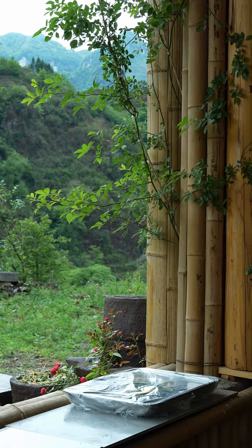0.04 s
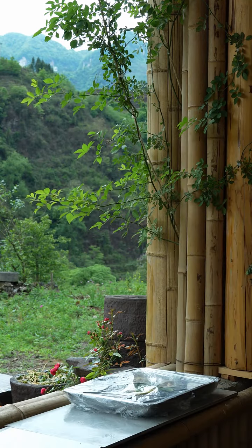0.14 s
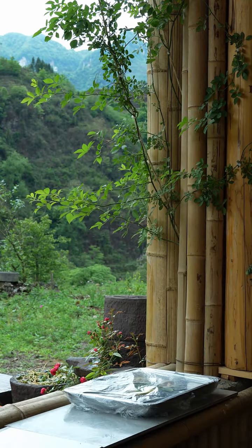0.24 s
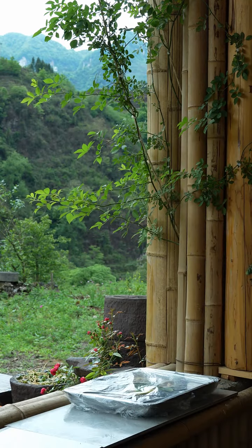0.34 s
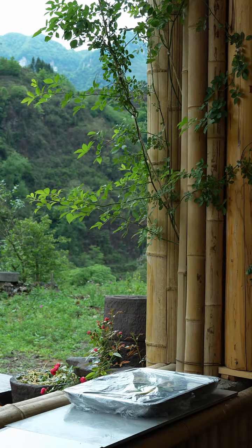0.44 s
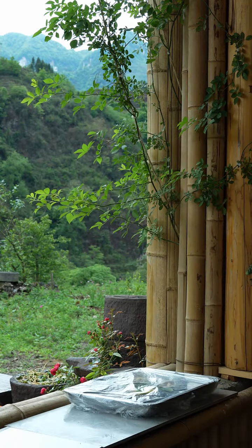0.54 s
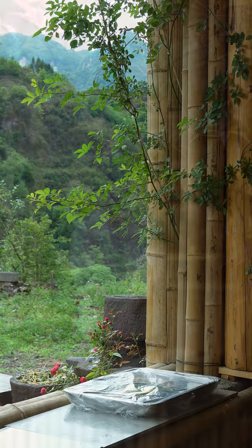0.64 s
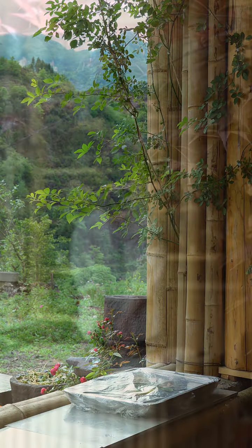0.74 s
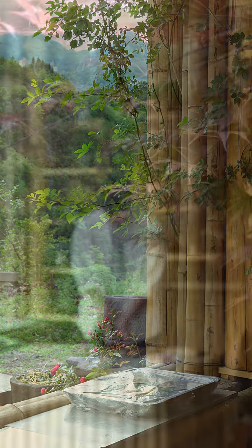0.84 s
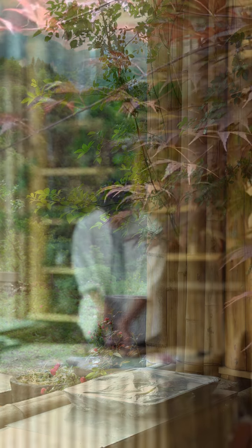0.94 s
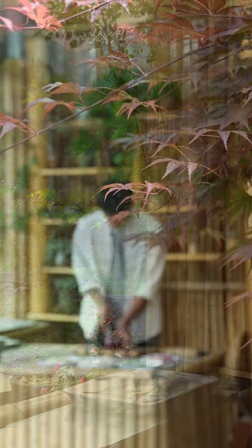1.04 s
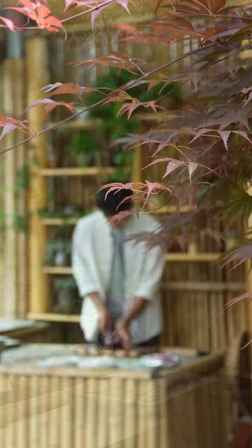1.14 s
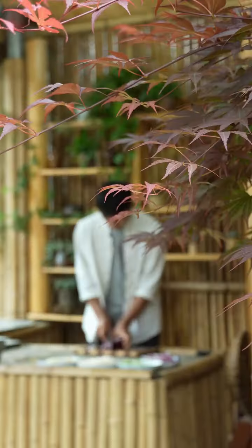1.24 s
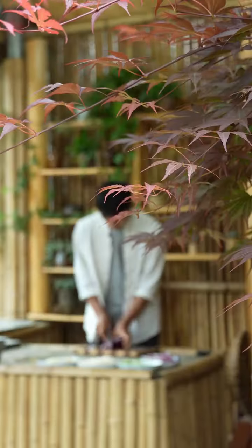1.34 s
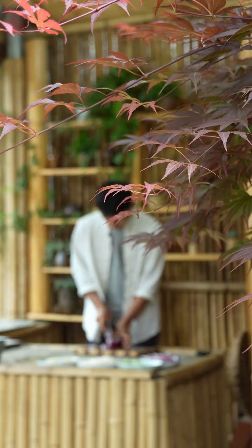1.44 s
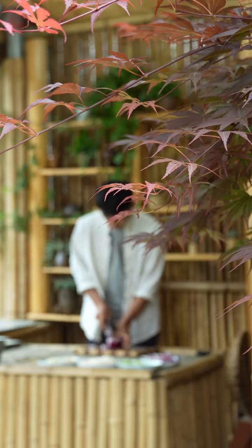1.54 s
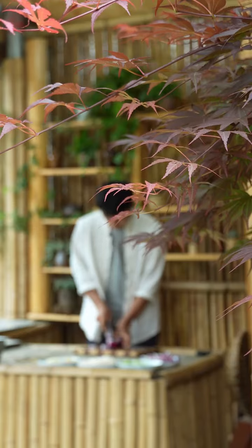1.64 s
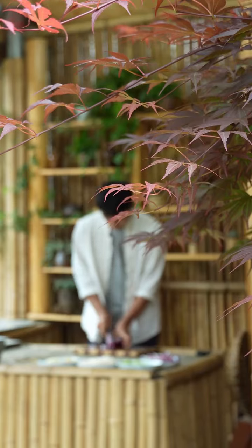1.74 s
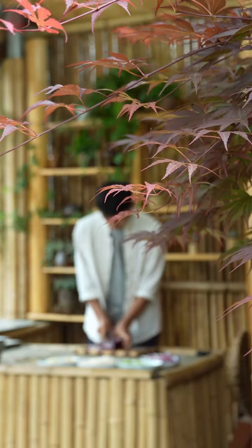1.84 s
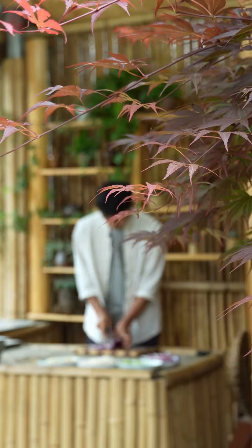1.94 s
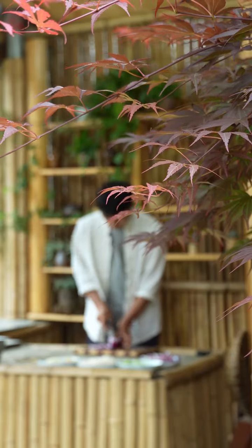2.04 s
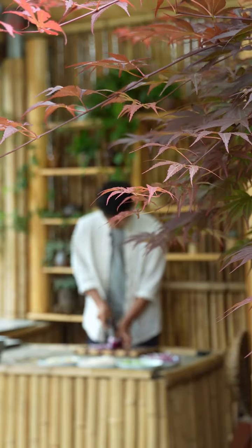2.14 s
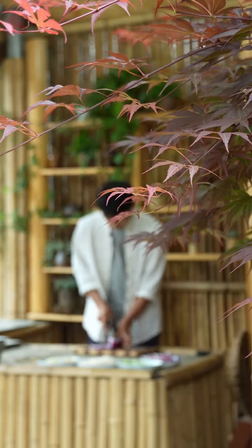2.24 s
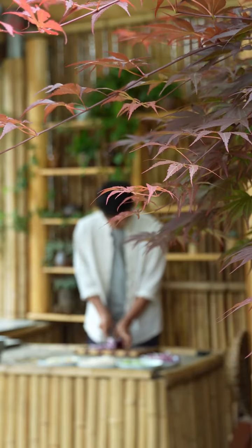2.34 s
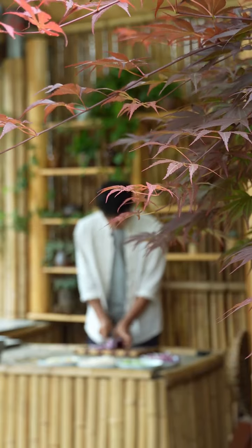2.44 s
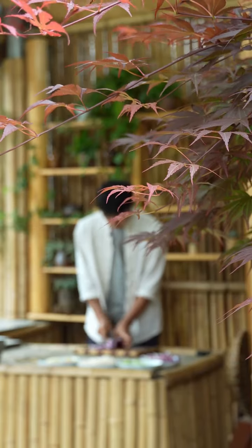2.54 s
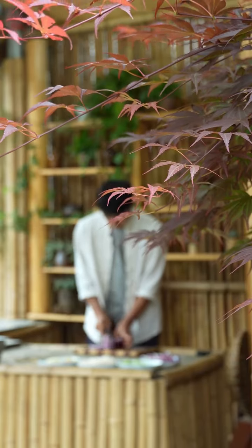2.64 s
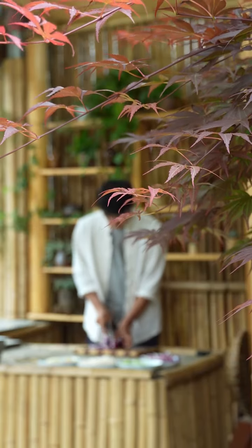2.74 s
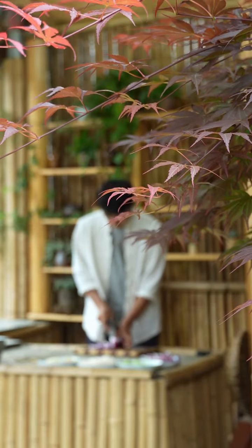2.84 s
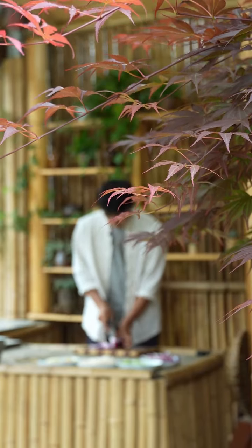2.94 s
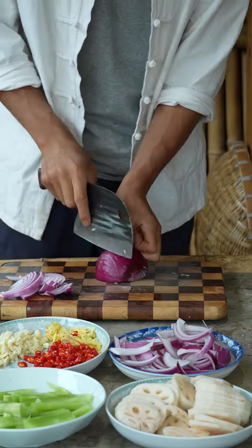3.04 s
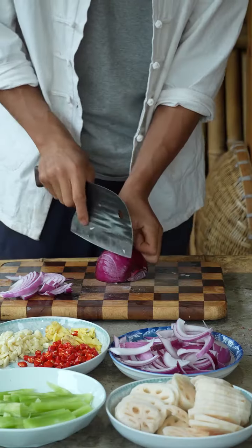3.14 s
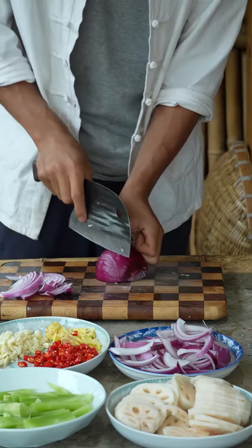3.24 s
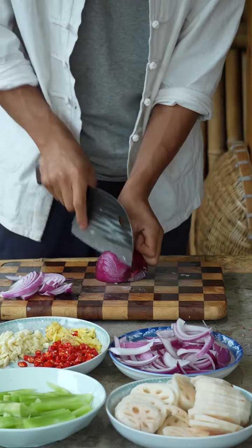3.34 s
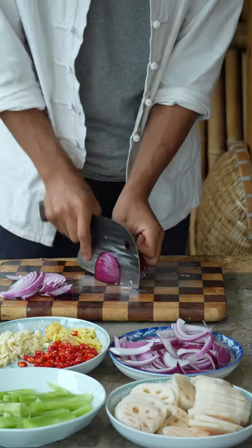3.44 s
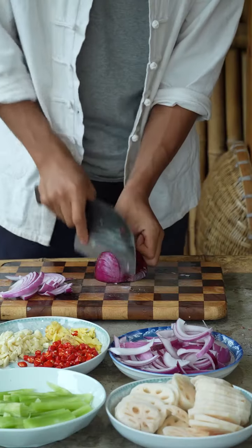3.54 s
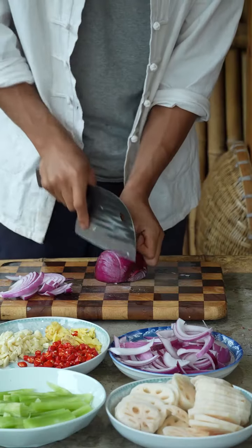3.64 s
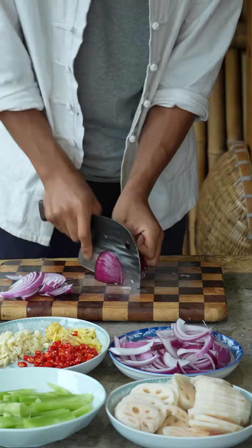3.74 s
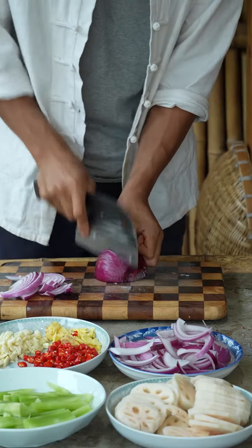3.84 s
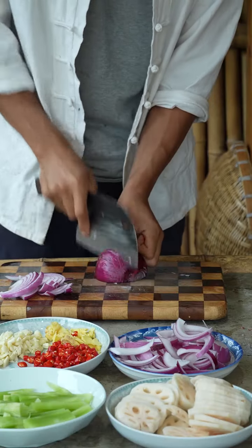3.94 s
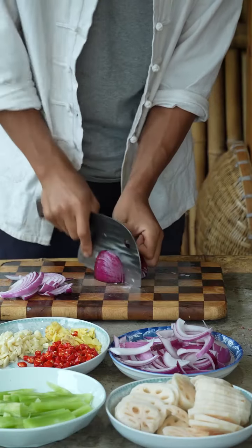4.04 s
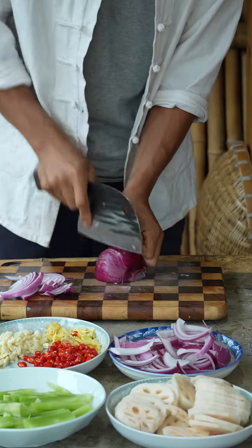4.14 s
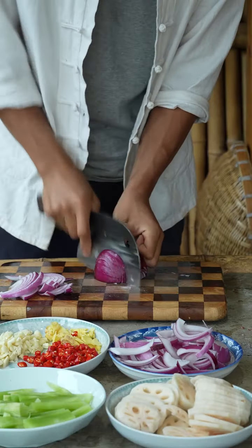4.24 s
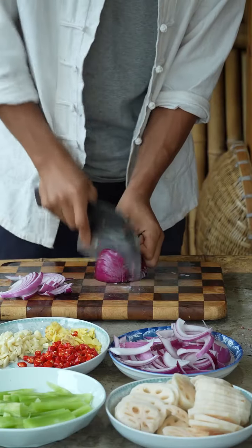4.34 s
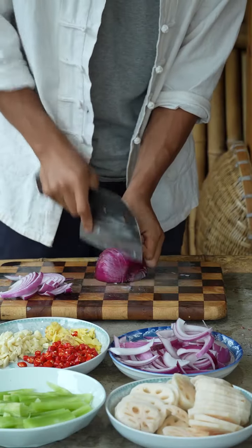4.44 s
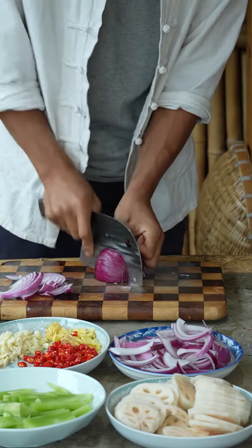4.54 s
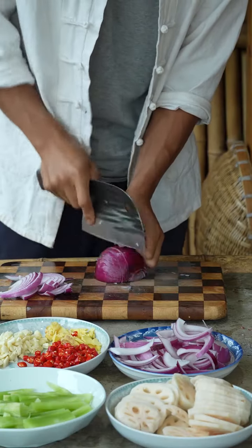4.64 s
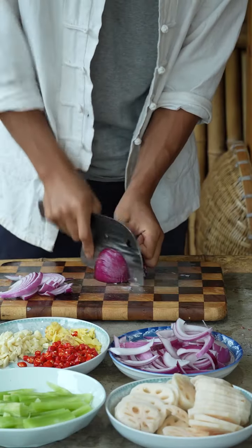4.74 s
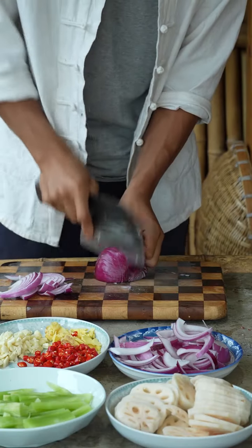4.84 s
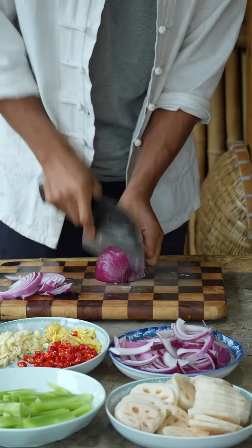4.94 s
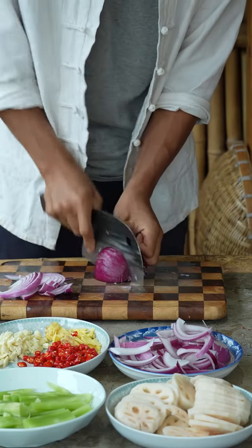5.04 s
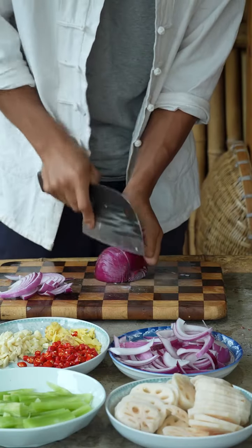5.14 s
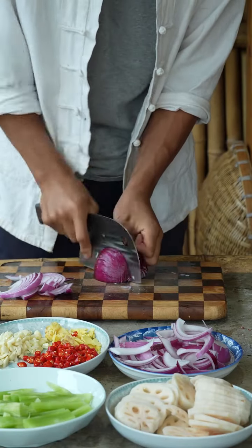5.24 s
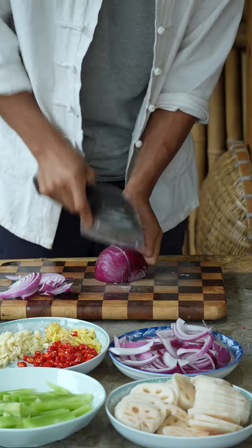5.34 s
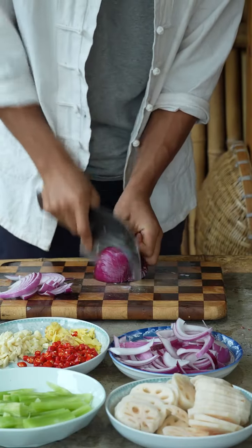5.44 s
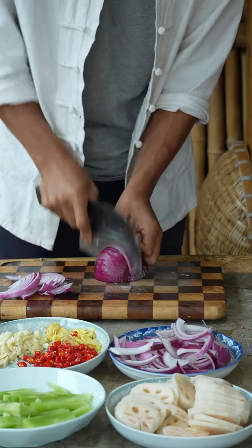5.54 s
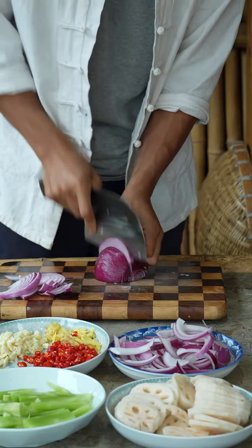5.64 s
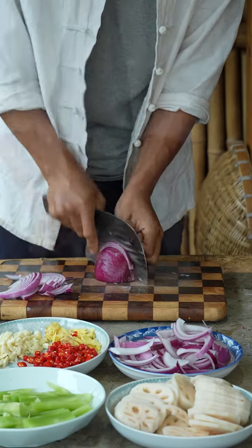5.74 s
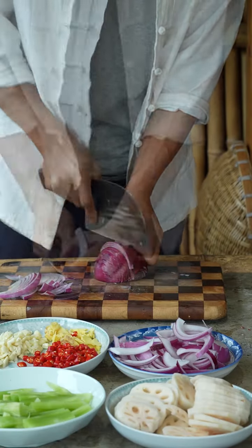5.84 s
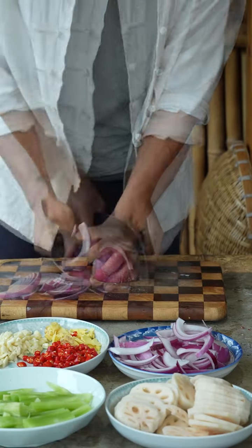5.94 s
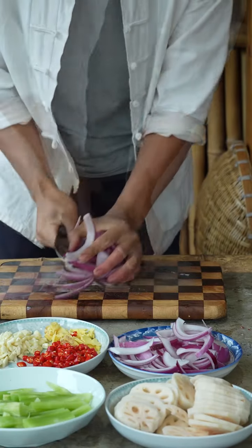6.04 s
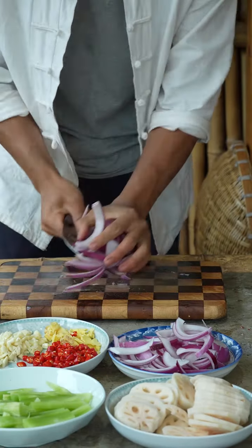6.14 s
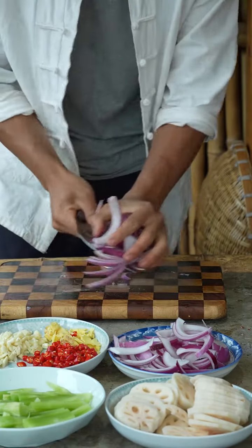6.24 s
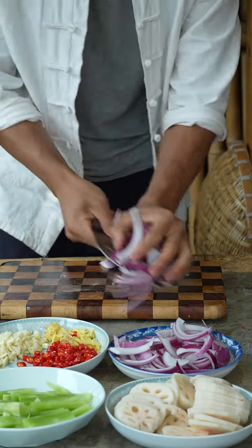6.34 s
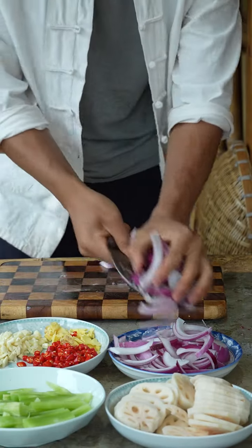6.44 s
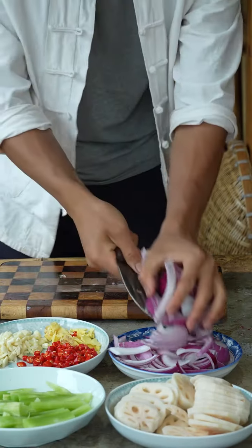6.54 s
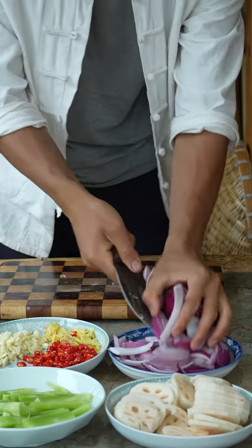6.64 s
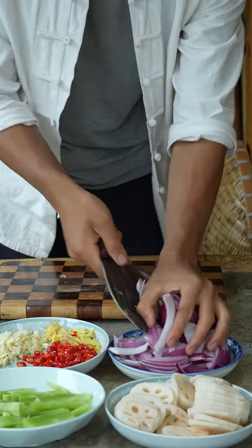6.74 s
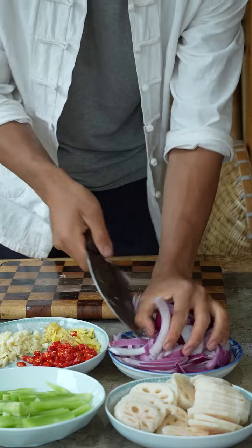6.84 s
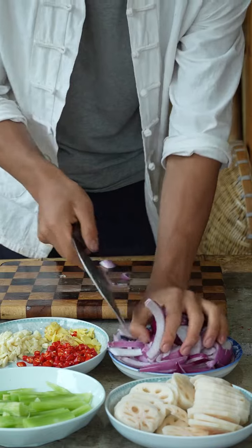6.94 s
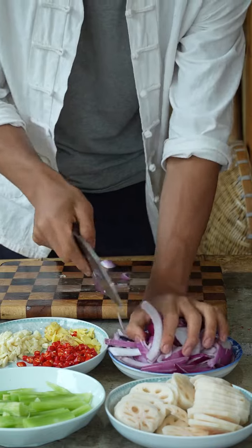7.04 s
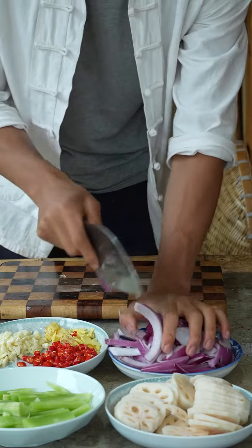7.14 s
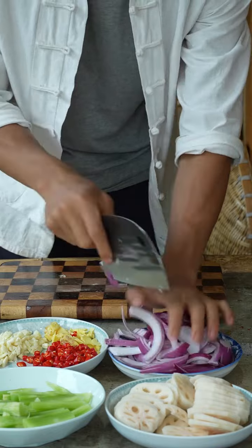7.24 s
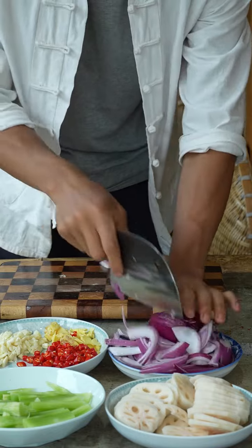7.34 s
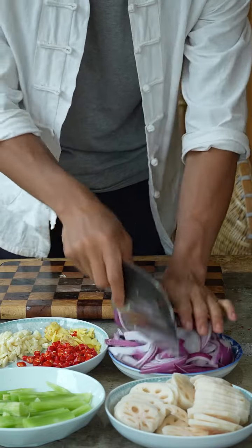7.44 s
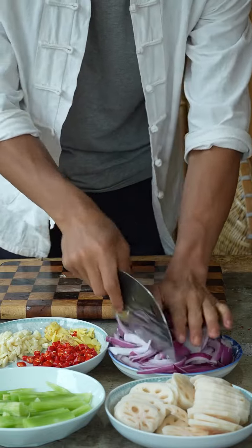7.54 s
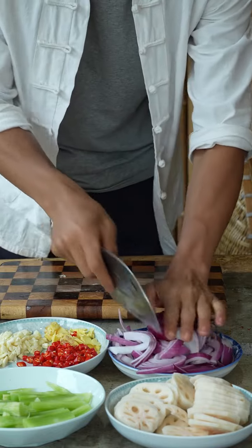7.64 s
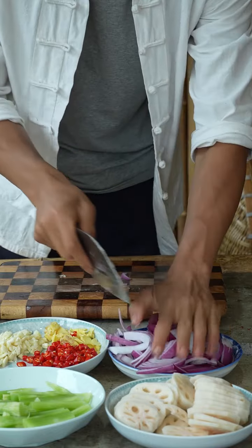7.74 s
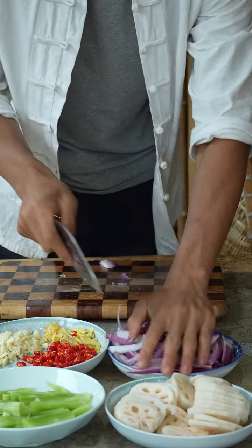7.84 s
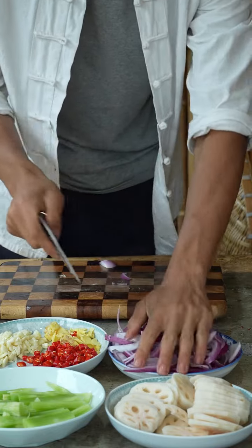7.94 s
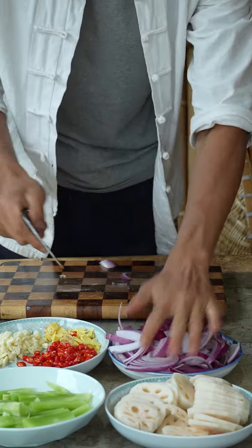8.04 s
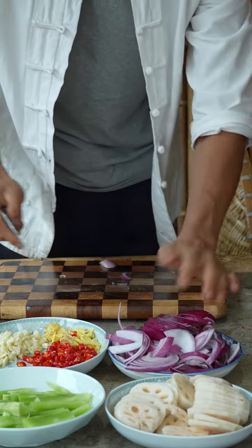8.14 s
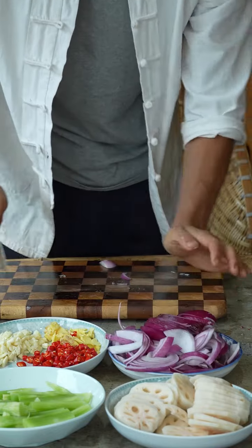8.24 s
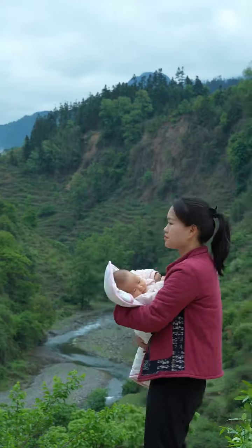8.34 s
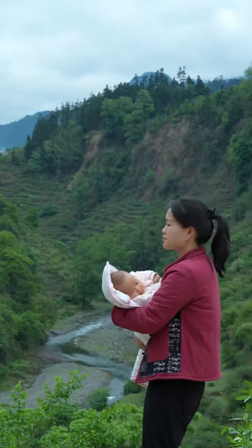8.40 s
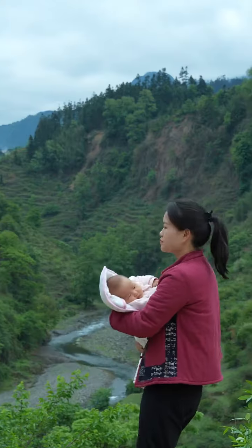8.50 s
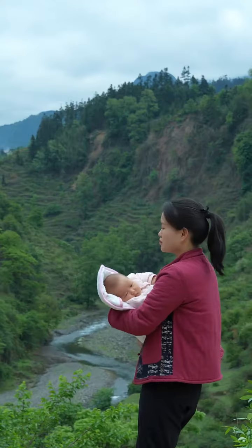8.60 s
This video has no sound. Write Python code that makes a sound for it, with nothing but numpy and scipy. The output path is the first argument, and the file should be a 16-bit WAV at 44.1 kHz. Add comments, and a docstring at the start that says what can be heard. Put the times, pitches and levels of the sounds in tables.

```python
"""A soft rustle in an open kitchen, with short swishes and taps of handling from left, middle and right.
Then a cleaver chops onion on a wooden board close to the microphone: single chops, then a fast run.
The blade crunches through the flesh and knocks the board, which rings and overloads the recorder.
Low air lies underneath; near the end the sound drops out and a quiet outdoor hush fades in."""
import sys
import numpy as np
from scipy import signal
from scipy.fft import rfft, irfft, next_fast_len
from scipy.io import wavfile
from scipy.ndimage import uniform_filter1d

SR = 44100
rng = np.random.default_rng(int(sys.argv[2]) if len(sys.argv) > 2 else 0)


def put_to_file(sound):
    """Save the sound as 16-bit audio at rate SR, in the file named by the first command-line argument."""
    columns = np.atleast_2d(sound).T  # one column per channel
    safe = np.clip(columns, -1, 1)
    whole_steps = np.round(safe * 32767)
    wavfile.write(sys.argv[1], SR, whole_steps.astype(np.int16))


N = 382347

# Blade on board, centre. Each row: time in seconds, peak in dB, low tone in Hz, upper tones, clack and
# thud in dB over the low tones, ring time factor, punch in dB over the ring, rebound delay in ms,
# rebound in dB, top tones in dB, rise in ms.
CHOPS = [(1.308, 0, 771, -22, -34, -21, 1.36, -30, 26, -6.5, -13.5, 3.9),
         (1.877, 0.5, 755.5, -26.5, -22, -22, 0.34, -18, 30, -8.5, -24, 7.2),
         (2.475, 1.5, 790, -14.5, -18.5, -23, 0.39, 3.5, 12, 3, -26.5, 1.6),
         (3.530, -5, 771, -20, -26.5, -21.5, 0.46, -19, 38, -11, -24, 7.7),
         (3.826, -9.5, 752, -19.5, -14, -22, 0.82, -5, 15, -17, -18.5, 3.3),
         (4.098, 1.5, 779, -13.5, -46, -21.5, 0.7, 1, 25, -7, -36.5, 6.3),
         (4.353, 4, 808, -13.5, -44, -11, 1.1, 23.5, 16, -16.5, -15, 1.5),
         (4.609, 0.5, 833, -7, -29, -27, 0.68, 13.5, 14, -17, -23, 3.6),
         (4.845, 3, 811, -7.5, -45.5, -18, .87, 5.5, 12.5, -0.5, -30.5, 2.9),
         (5.086, 2.5, 833, -5, -26, -36.5, 0.99, 2.5, 14, -13.5, -33, 7.2),
         (5.311, 2.5, 840, -20.5, -8.5, -34.5, 0.84, -19, 16, -14, -45, 3.2),
         (5.566, 2.5, 831, -16, -29, -29.5, 0.89, 3.5, 11, -13.5, -29, 8.3),
         (5.809, 2.5, 832.3, -10.5, -36, -47, 1.1, -2.5, 8, -9, -24, 4.2),
         (6.043, 1.4, 835, -11.5, -19.5, -31, 0.73, 7, 26, -9, -23, 7.1)]
# Blade into onion. Each row: time of the skin's snap in seconds, snap in dB, crunch in dB,
# seconds from the snap until the crunch fades.
CUTS = [(2.433, -32.5, -29.5, 0.057), (4.024, -7.5, -33.5, 0.062), (4.288, -13.5, -24, 0.054),
        (4.543, -21, -26, 0.059), (4.784, -9.5, -25, 0.056), (5.016, -9.5, -24.5, 0.054),
        (5.258, -8, -33, 0.043), (5.504, -28, -25, 0.059), (5.728, -18, -23.5, 0.06),
        (5.983, -16, -24.5, 0.058)]
# The board's low modes, which shift with the place of the blow.
# Each row: factor on the low tone, level in dB, t60 in seconds.
BOARD_LOW = [(1, 2, 0.13), (0.91, -12, 0.17), (1.07, -8.5, 0.076), (1.2, -21, 0.086), (0.748, -16.5, 0.077),
             (0.53, -25.5, 0.15)]
# Modes of board, blade and table. Each row: frequency in Hz, level in dB, t60 in seconds.
BOARD_UPPER = [(1255.4, 10, 0.093), (1250, -23.5, 0.15), (1080, -26.5, 0.33), (990, -6.5, 0.024),
               (1391, -4, 0.053)]
BOARD_TOP = [(1693, 2.5, 0.019), (1480, -12, 0.032), (2000, -10, 0.072), (2247, -6.5, 0.016)]
BLADE_MODES = [(2663, 6, 0.015), (2186, -12.5, .06), (3000, -9.5, .04), (2420, -12.5, .05),
               (2940, -20.5, 0.033), (4470, -23, .012), (5760, -26.5, .01)]
TABLE_MODES = [(340, 8, 0.011), (207, -7.5, 0.12), (120, -10.5, 0.065)]
# Things being handled. Each row: start in seconds, click in dB, ring in dB, pitch in Hz,
# left over right in dB.
TAPS = [(.683, -38, -41, 4600, -22), (1.048, -24.5, -44, 880, -15), (1.50, -51, -33, 103, .5),
        (1.566, -33.5, -45, 3860, -18), (1.781, -39, -43, 4930, -19), (7.812, -21, -30, 815, .3),
        (8.184, -32, -43, 990, 14), (8.489, -39, -41, 790, -2)]
# Swishes of handling. Each row: end of the rise in seconds, hold, rise and fall in ms,
# bright and deep parts in dB, left over right in dB.
SWISHES = [(.685, 57, 7.4, 100, -38.5, -51, -21.5), (1.05, 67, 33, 62, -45.5, -50, -32),
           (1.33, 27, 20, 230, -42, -29.5, 0), (1.4, 94, 140, 34, -33, -42.5, -6),
           (1.57, 50, 22, 120, -33.5, -45, -6.5), (1.79, 117, 20, 60, -32.5, -47.5, -10.5),
           (1.9, 25, 62, 230, -31.5, -30, -0.5), (2.48, 15, 64, 177, -37, -32, 3.5),
           (2.9, 33, 110, 200, -40, -42.5, 0), (3.082, 70, 22, 190, -33, -40.5, -0.5),
           (3.3, 32, 110, 69, -47.5, -55, -20), (3.5, 33, 93, 65, -30.5, -37, 0),
           (3.6, 50, 69, 180, -33, -38.5, -12), (3.8, 83, 195, 120, -27.5, -33, 0),
           (3.98, 100, 55, 100, -39, -44, -21), (4.059, 30, 110, 390, -31, -33, 0),
           (6.4, 30, 120, 170, -33.5, -37, 0.5), (6.55, 54, 40, 43, -41.5, -69, -25.5),
           (6.72, 85, 17, 67, -43, -46, -22), (6.84, 58, 110, 100, -43.5, -42.5, 11),
           (6.92, 56, 67, 72, -38, -48, -21), (7.05, 150, 100, 150, -40.5, -44, 6.5),
           (7.28, 67, 100, 96, -37.5, -47.5, -14.5), (7.422, 73, 21, 74, -28.5, -39, 0),
           (7.66, 46, 63, 46, -35.5, -46, -13), (7.81, 28, 11, 110, -36.5, -43, -1),
           (7.87, 19, 50, 45, -43, -53, -18), (7.96, 40, 52, 100, -32.5, -40, 0.5),
           (8.186, 28, 8, 63, -38, -47, 13.5), (8.37, 26, 124, 67, -39, -44.5, 12.5)]
# The rustle in the middle. Each row: time in seconds, bright and deep parts in dB.
RUSTLE_LEVELS = [(0, -42, -43.5), (.08, -47.5, -48.5), (.26, -35, -38), (.47, -52, -50), (.62, -38, -43.5),
                 (.82, -39, -42.5), (.94, -33, -38.5), (1.2, -47.5, -47), (2.15, -46.5, -49),
                 (2.38, -42, -42.5), (2.68, -53.5, -49), (3.4, -58, -48), (4.2, -55.5, -41),
                 (6.1, -36.5, -43), (6.35, -45.5, -44), (7.15, -42, -45), (7.6, -45.5, -44.5),
                 (8.5, -58, -44.5), (8.54, -66.5, -76.5), (8.62, -61.5, -59), (8.67, -55, -51)]
# Slow curves. Each row: time in seconds, level in dB.
SHEEN_LEVELS = [(5.85, -35), (5.93, -11), (6, -19.5), (7.6, -38.5), (7.73, -11.5), (8, -22), (8.15, -13),
                (8.67, -25.5)]  # a thin high sheen, relative to the bright part
SIDE_LEVELS = [(0, -15.5), (.45, -12.5), (1.1, 1), (1.27, -22), (1.45, -5), (2, -11.5), (2.9, -11),
               (3.15, -2.5), (3.8, -15.5), (4.2, -21), (6.15, -23), (6.35, 0.5), (7.3, 2), (7.75, -11),
               (8, -2), (8.67, -7)]  # stereo width of rustle and swishes
AIR_LEVELS = [(0, -56.5), (2, -55.5), (4, -57), (5, -78), (7, -79), (8.67, -70)]
# Spectra. Each row: frequency in Hz, gain in dB.
CRUNCH_SPECTRUM = [(200, -14), (500, -9), (850, 11), (1250, 2), (1900, 11.5), (3200, 8.5), (4500, 5),
                   (6000, 5), (12000, 9.5)]
BASS_CUT = [(20, -39), (200, -17), (500, -6.5)]  # hum and shaken board carry little bass
SWISH_SPECTRUM = [(600, -41), (1300, -10.5), (2000, -9.5), (3000, -1.5), (4500, -3), (5600, -6),
                  (7000, -5.5), (12000, 0)]  # bright part of a swish
BRIGHT_SPECTRUM = [(600, -49), (1300, -3.5), (2000, -9.5), (3000, 0.6), (4200, -4.5), (5600, -9.5),
                   (7000, -9), (12000, 0.5)]  # bright part of the rustle
DEEP_SPECTRUM = [(30, -27.5), (70, -43), (130, -17.5), (250, -7.5), (500, -5.5), (850, -1.3), (1250, -5.5),
                 (2000, -11), (3500, -21)]  # deep part of both
SHEEN_SPECTRUM = [(4600, -36), (5250, -6), (5700, 0), (6050, -6), (6700, -36)]
AIR_SPECTRUM = [(15, 0), (30, -3), (50, .1), (80, -14.5), (130, 7), (250, 3), (450, -27.5)]
MIC_RESPONSE = [(20, -7), (5800, 1), (6800, -6), (7600, -17.5), (8600, -25.5), (10000, -44), (12000, -74),
                (22000, -95)]
# How alike the noise is left and right. Each row: frequency in Hz, correlation.
LIKENESS = [(60, 0.52), (200, 0.65), (650, 0.54), (2160, 0.38), (7130, 0.12)]
# The level dips briefly. Each row: start in seconds, end in seconds, depth in dB.
DIPS = [(1.495, 1.555, -6), (1.685, 1.769, -7.5), (8.498, 8.56, -24.5)]

HUM_DB, HUM_T60_S = -26, 0.38  # table and room keep the tones going
THUMP_DB, THUMP_MS = -4.5, 0.92  # a short, dull low thump at the knock's peak; level over the thud
TICK_DB, SHAKEN_DB = -14.5, -11  # edge on wood, over the low tones; shaken board, over the crunch
LEAD_S, BITE_S, THROUGH_S = 0.02, 0.036, 0.02  # the crunch: lead on the snap, rise, fade
DEEP_PAN_SHARE, SWISH_EDGE_DB = 0.5, 20  # pan the deep part follows; change over a rise or fall time
RECORDER_BIAS, BAND_LIMIT_HZ = 0.0013, 15600


def chop(s, db, low_hz, upper_db, blade_db, thud_db, stretch, punch_db, rebound_ms, rebound_db,
         top_db, rise_ms):
    """The blow builds as the edge sinks in, peaks in a punch and rebounds; a rough hum lingers."""
    t = np.arange(-SR // 50, SR // 2) / SR  # zero at the peak
    tones = ring(low_modes(low_hz), t, stretch, spread_db=1.5, wave=np.cos)
    tones += amp(upper_db) * ring(BOARD_UPPER, t, stretch, spread_db=3.3)
    tones += amp(top_db) * ring(BOARD_TOP, t, stretch, spread_db=4.8)
    punch = amp(punch_db) * np.exp(-(t / 0.0072) ** 2)
    # The blade clacks once it is stopped.
    clack = amp(blade_db) * ring(BLADE_MODES, t, spread_db=1.5) * onset(t, 0.0008)
    tick = amp(TICK_DB - 60 * abs(t) / 0.013) * crisp(rng.standard_normal(len(t)))
    thump = amp(THUMP_DB) * np.exp(-(t * 1000 / THUMP_MS) ** 2)
    thud = amp(thud_db) * (ring(TABLE_MODES, t, stretch) + thump)
    blow = (tones * (1 + punch) + thud) * onset(t, rise_ms / 1000)
    cycles = round(rebound_ms * low_hz / 1000)  # the rebound lands in step with the low tone
    rebound = amp(rebound_db) * np.roll(tones * onset(t, 0.005), round(cycles * SR / low_hz))
    knock = blow + rebound + clack + tick
    hum = room_hum(tones * amp(-60 * t / 0.54) + clack, t)
    return s + t[0], amp(db) * (knock / abs(knock).max() + amp(HUM_DB) * hum)


def room_hum(ringing, t):
    """Table and room scatter a chop's tones into a short tail, almost alike left and right."""
    scatter = rng.standard_normal((len(t), 2)).T * amp(-60 * t / HUM_T60_S) * np.clip(t / 0.00067, 0, 1)
    scatter[1] = scatter[0] + 0.021 * scatter[1]
    tail = signal.fftconvolve(scatter, ringing[None, t >= 0], axes=1)[:, :len(t)]
    hum = coloured(tail, BASS_CUT)
    return hum / np.sqrt(np.mean(hum[:, :3000] ** 2))


def onion_cut(s, snap_db, crunch_db, length_s):
    """Cells burst and shake the board until the blade is through; the skin snaps near the start."""
    t = np.arange(-SR // 40, SR // 6) / SR  # zero at the snap
    burst_sizes = amp(2.2 * np.minimum(rng.exponential(1, len(t)), 4))
    cells = crisp(burst_sizes * rng.standard_normal(len(t)))
    stroke = np.clip((t + LEAD_S) / BITE_S, 0, 1) * np.clip((length_s - t) / THROUGH_S + 1, 0, 1)
    crunch = cells * stroke
    board = ring(low_modes(low_hz=820) + BOARD_UPPER, t, stretch=0.42)[t >= 0]
    shaken = unit_rms(coloured(signal.fftconvolve(crunch, board)[:len(t)], BASS_CUT))
    crack = 0.25 * cells * amp(-60 * abs(t) / 0.012)
    crack_ring = 0.12 * ring(BOARD_UPPER, t, stretch=0.22, spread_db=2)
    snap = (crack + crack_ring) * np.clip(t / 0.001, 0, 1)
    return s + t[0], amp(crunch_db) * (crunch + amp(SHAKEN_DB) * shaken) + amp(snap_db) * snap


def tap(s, click_db, ring_db, hz, pan_db):
    """Something handled near the board gives a broadband click and a short ring."""
    t = np.arange(6000) / SR
    click = crisp(rng.standard_normal(len(t))) * amp(click_db - 60 * t / 0.009)
    tone = amp(ring_db - 60 * t / (0.028 + 12 / hz)) * np.sin(2 * np.pi * hz * t)
    return s, amp(np.array([[0.5], [-0.5]]) * pan_db) * (click + tone)


def swish_envelope(s, hold_ms, rise_ms, fall_ms):
    """One movement of handling rises, holds and falls: a gain at every sample."""
    ms = (np.arange(N) / SR - s) * 1000
    before = np.maximum(-ms, 0) / rise_ms
    after = np.maximum(ms - hold_ms, 0) / fall_ms
    return amp(-SWISH_EDGE_DB * (before + after))


def handling_rustle():
    """Bright and deep hiss: a soft bed in the middle, and swishes that each come from their own side."""
    powers = np.array([swish_envelope(*row[:4]) for row in SWISHES]) ** 2
    bright_db, deep_db, pan_db = np.transpose(SWISHES)[4:]
    pan = np.array([[1], [-1]]) * pan_db
    # Overlapping swishes add in power.
    bright_swishes = np.sqrt(amp(2 * bright_db + pan) @ powers)
    deep_swishes = np.sqrt(amp(2 * deep_db + DEEP_PAN_SHARE * pan) @ powers)
    bright_bed, deep_bed = amp(curves(RUSTLE_LEVELS))
    side_db = curves(SIDE_LEVELS)[0]
    bright = bright_swishes * hiss(SWISH_SPECTRUM, side_db, patchy_db=1.3)
    bright += bright_bed * hiss(BRIGHT_SPECTRUM, side_db, patchy_db=1.3)
    sheen_gain = amp(curves(SHEEN_LEVELS)[0]) * (bright_swishes + bright_bed)
    sheen = sheen_gain * hiss(SHEEN_SPECTRUM, side_db, patchy_db=4.1)
    deep = deep_swishes * hiss(DEEP_SPECTRUM, side_db, patchy_db=0.59)
    deep += deep_bed * hiss(DEEP_SPECTRUM, side_db, patchy_db=0.59)
    return bright + sheen + deep


def low_air():
    """A faint rumble of air behind everything."""
    return amp(curves(AIR_LEVELS)[0]) * hiss(AIR_SPECTRUM, side_db=-9, patchy_db=3.3)


def hiss(spectrum, side_db, patchy_db):
    """Stereo noise with drifting patches, partly alike left and right; side_db sets its width."""
    hz = np.fft.rfftfreq(512, 1 / SR)
    left_re, left_im, other_re, other_im, patches = rng.standard_normal((N // 128 + 5, 257, 5)).T
    patches = unit_rms(uniform_filter1d(uniform_filter1d(patches, 10, axis=0), 14, axis=1))
    likeness = at_hz(LIKENESS, hz)[:, None]
    left = left_re + 1j * left_im
    right = likeness * left + np.sqrt(1 - likeness ** 2) * (other_re + 1j * other_im)
    frames = np.array([left, right]) * amp(at_hz(spectrum, hz)[:, None] + patchy_db * patches)
    noise = unit_rms(signal.istft(frames, nperseg=512, noverlap=384)[1][:, :N])
    mid, side = noise.mean(0), (noise[0] - noise[1]) / 2 * amp(side_db)
    return np.array([mid + side, mid - side])


def ring(modes, t, stretch=1, spread_db=0.0, wave=np.sin):
    """Dying waves, in step at t = 0; each blow shares its force a little differently among them."""
    shares_db = spread_db * rng.standard_normal(len(modes))
    return sum(amp(db + share - 60 * np.maximum(t, 0) / (t60 * stretch)) * wave(2 * np.pi * hz * t)
               for (hz, db, t60), share in zip(modes, shares_db))


def low_modes(low_hz):
    return [(low_hz * factor, db, t60) for factor, db, t60 in BOARD_LOW]


def onset(t, rise_s):
    """A bell-shaped rise that reaches 1 at t = 0 and stays there."""
    return np.exp(-(np.minimum(t, 0) / rise_s) ** 2)


def crisp(noise):
    return unit_rms(coloured(noise, CRUNCH_SPECTRUM))


def coloured(x, spectrum):
    """Filters by a spectrum in dB."""
    size = next_fast_len(x.shape[-1])
    gains = amp(at_hz(spectrum, np.fft.rfftfreq(size, 1 / SR)))
    return irfft(rfft(x, size) * gains, size)[..., :x.shape[-1]]


def at_hz(points, hz):
    point_hz, values = np.transpose(points)
    return np.interp(np.log(hz + 1), np.log(point_hz + 1), values)


def curves(rows):
    """Columns of a timed table at every sample."""
    s, *columns = np.transpose(rows)
    return [np.interp(np.arange(N) / SR, s, column) for column in columns]


def amp(db):
    return 10 ** (np.asarray(db) / 20)


def unit_rms(x):
    return x / np.sqrt(np.mean(x ** 2) + 1e-20)


def add(mix, s, sound):
    part = mix[..., round(s * SR):][..., :sound.shape[-1]]
    part += sound[..., :part.shape[-1]]


def scene():
    """The kitchen from beside the board: chops, cuts and taps over rustle and air, with brief dips."""
    mix = handling_rustle() + low_air()
    for rows, source in ((CHOPS, chop), (CUTS, onion_cut), (TAPS, tap)):
        for row in rows:
            add(mix, *source(*row))
    t = np.arange(N) / SR
    dips_db = sum(db * ((t > start) & (t < end)) for start, end, db in DIPS)
    return mix * amp(uniform_filter1d(dips_db, 500))


def record(dry):
    """A dull microphone, hard overload on the loudest knocks, then the recorder's band limit."""
    clipped = np.clip(coloured(dry, MIC_RESPONSE) + RECORDER_BIAS, -1, 1)
    lowpass = signal.firwin(511, BAND_LIMIT_HZ, window=("kaiser", 9), fs=SR)
    return signal.oaconvolve(clipped, lowpass[None], "same")


dry = scene()
out = record(dry)
put_to_file(out)
```